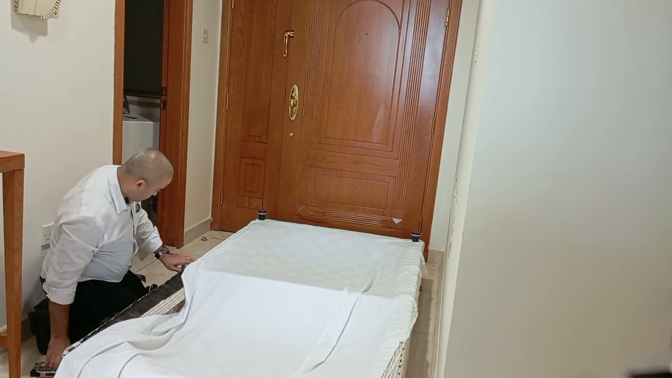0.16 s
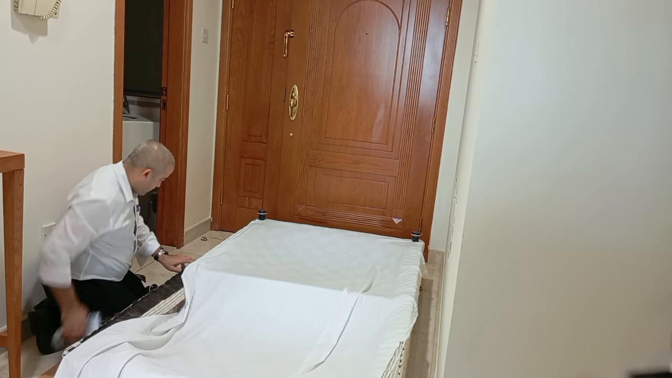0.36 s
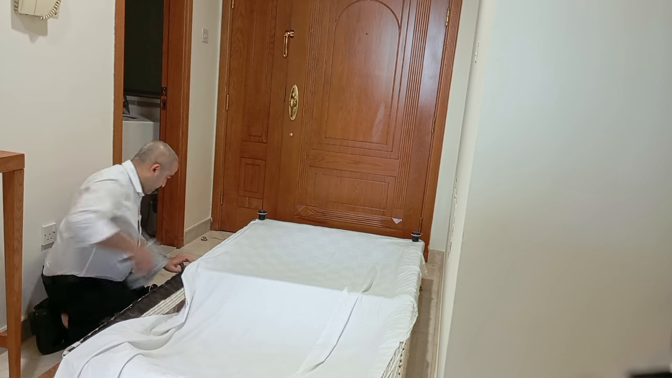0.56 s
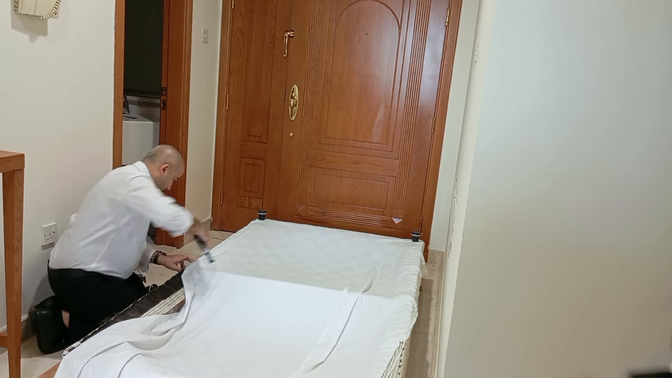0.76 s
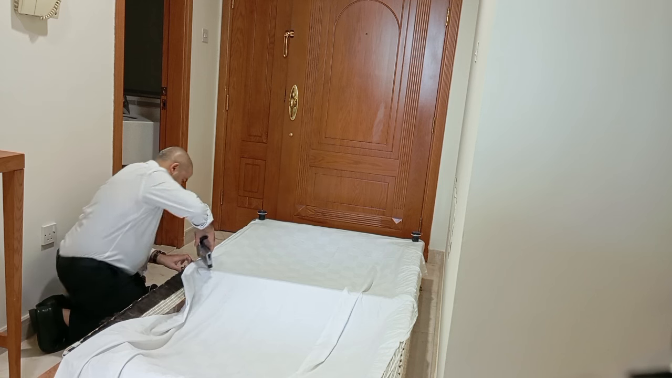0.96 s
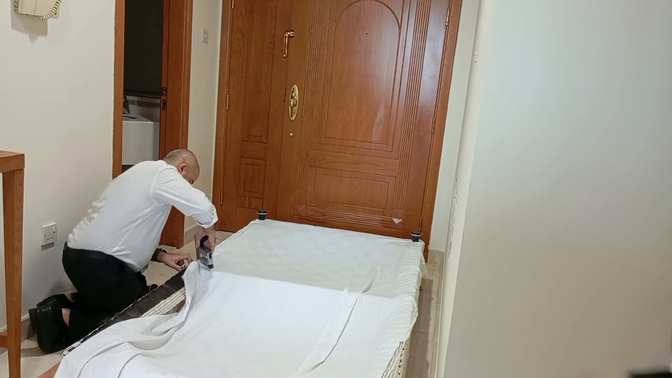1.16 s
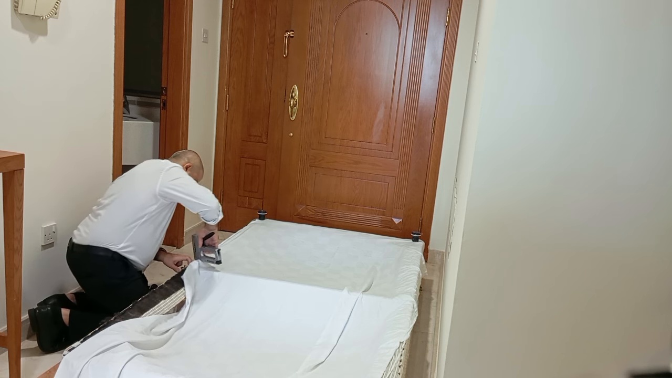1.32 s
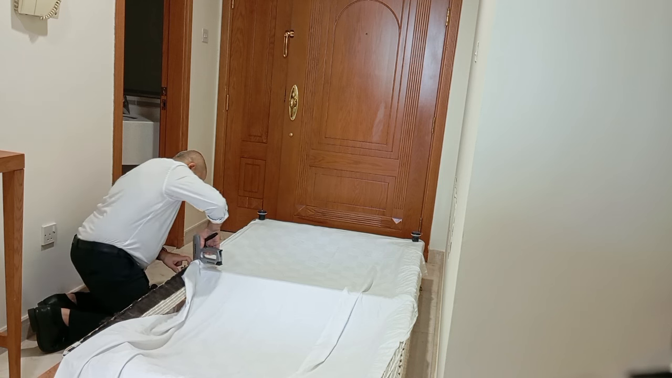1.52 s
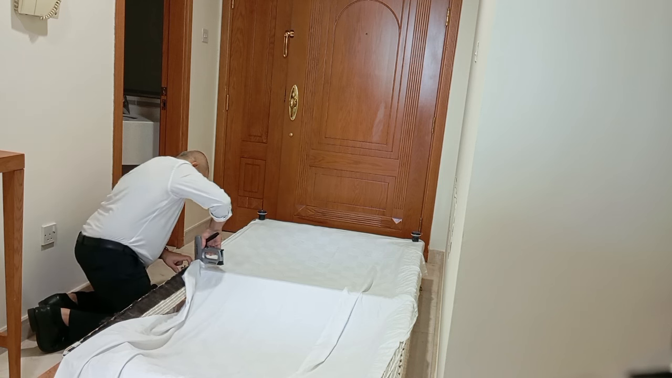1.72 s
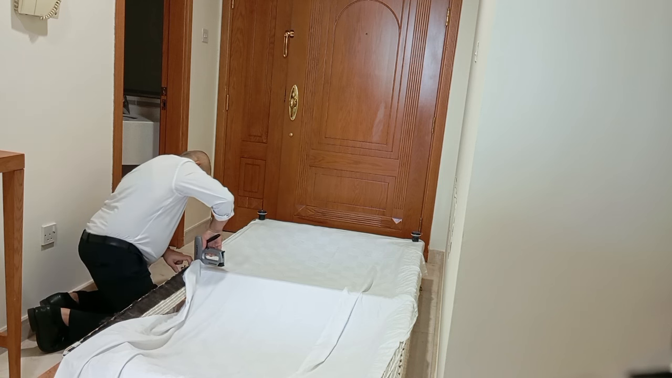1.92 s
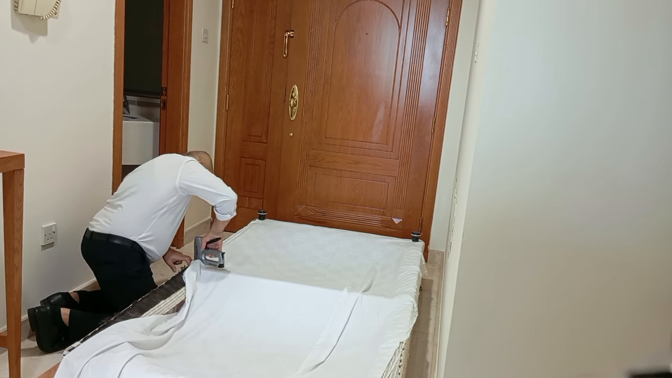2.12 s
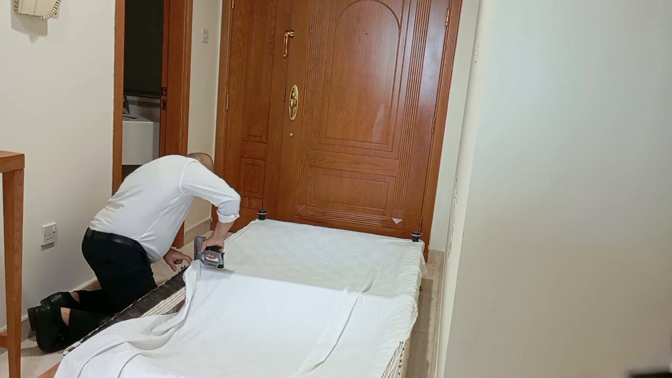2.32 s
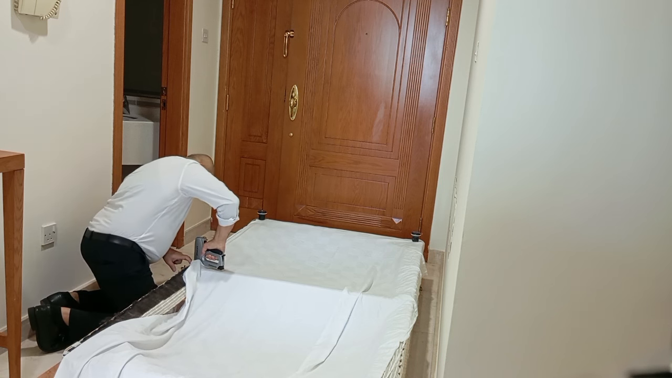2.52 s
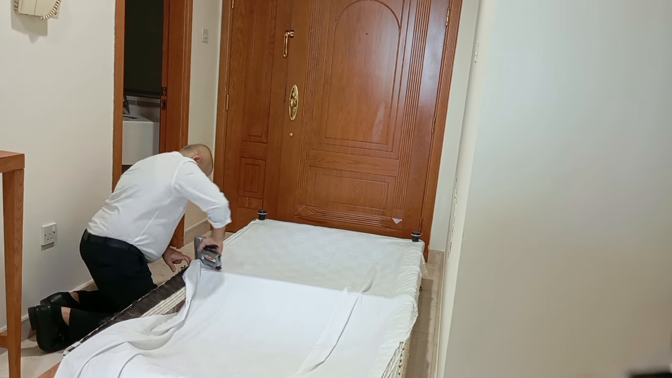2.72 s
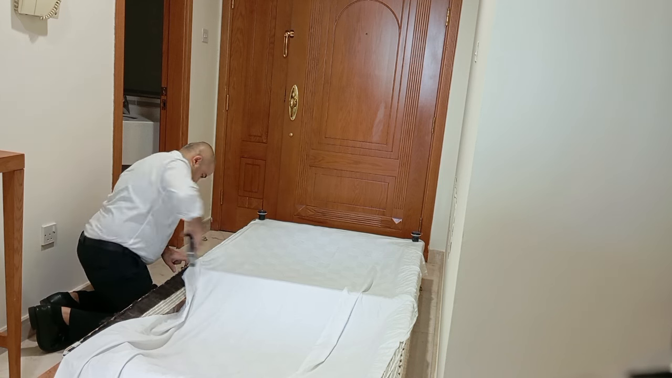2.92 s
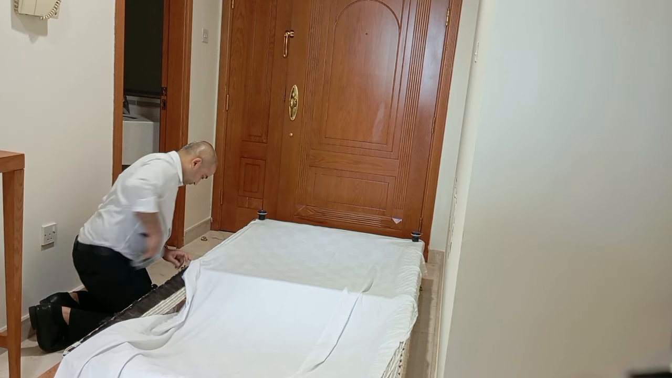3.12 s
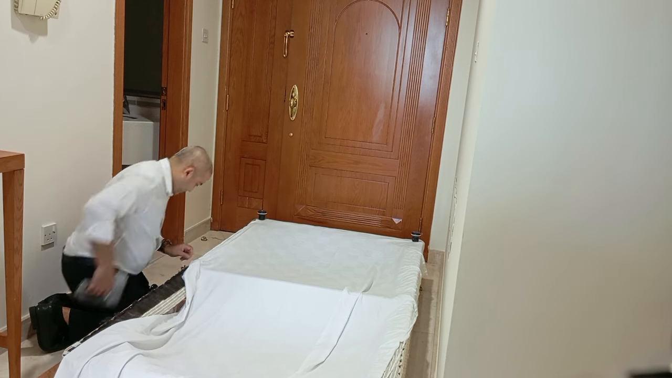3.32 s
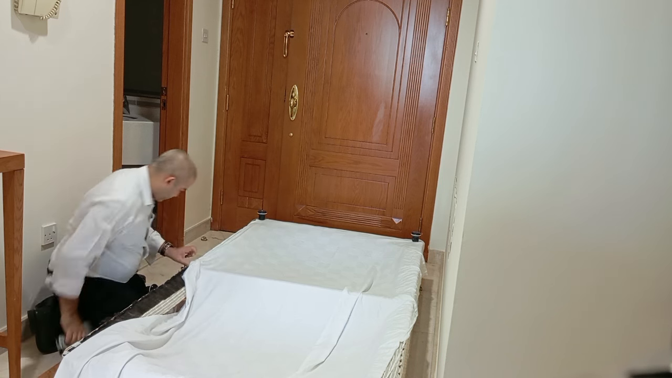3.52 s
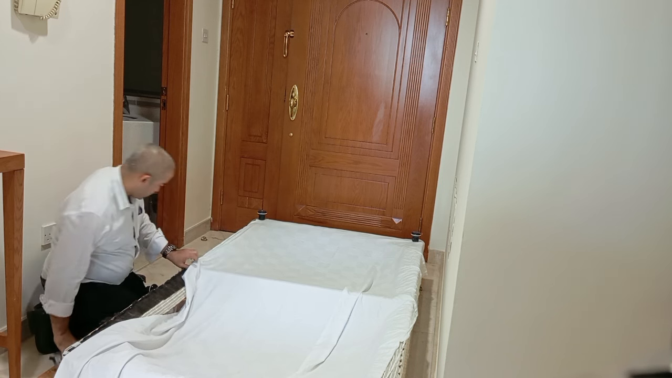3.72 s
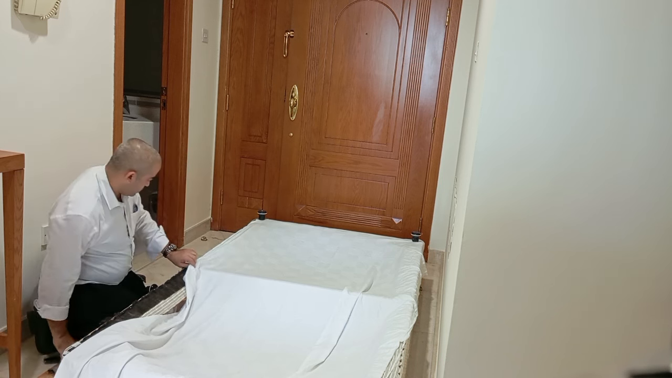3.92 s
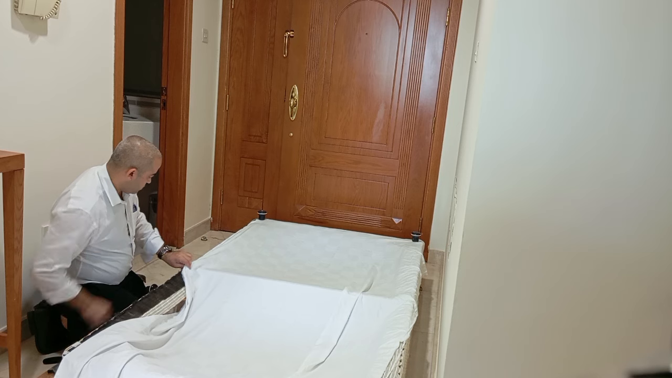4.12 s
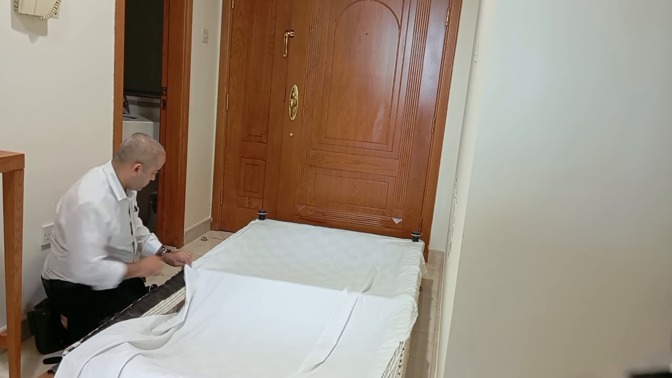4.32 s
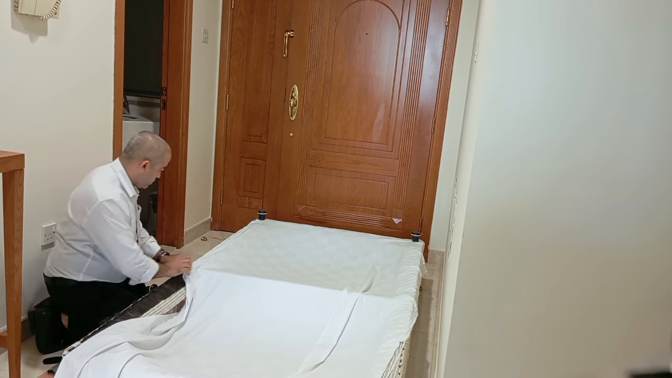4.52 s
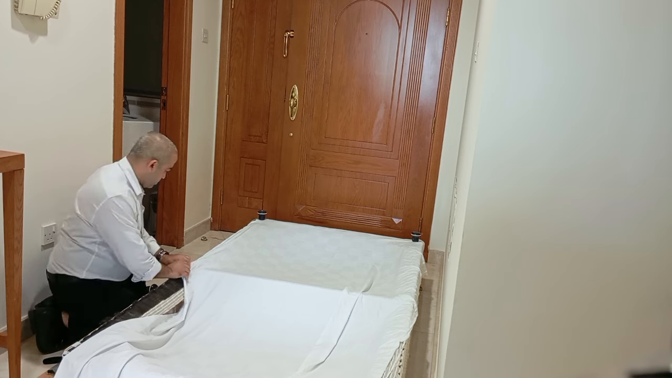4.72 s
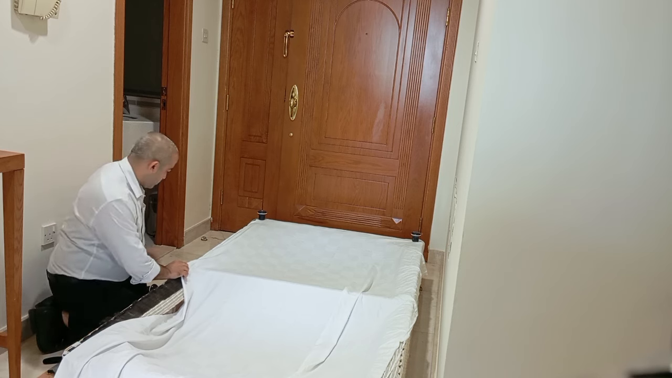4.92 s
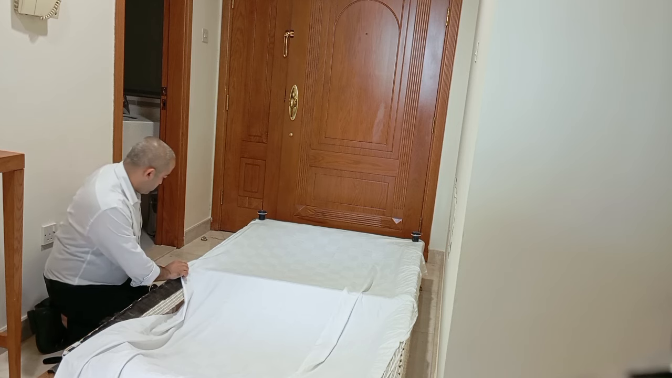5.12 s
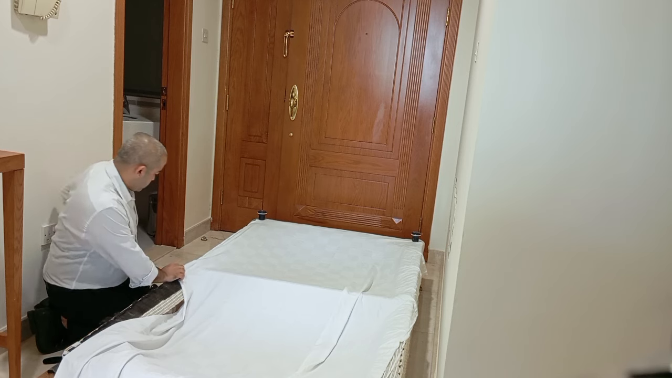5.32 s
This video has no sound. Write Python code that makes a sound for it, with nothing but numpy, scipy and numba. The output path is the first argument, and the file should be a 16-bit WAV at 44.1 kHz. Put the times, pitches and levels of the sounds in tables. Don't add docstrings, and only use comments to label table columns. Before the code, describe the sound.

Quiet indoor hallway air with a soft low rumble. Small dull taps open, then a gentle wooden touch. Midway a single staple shot cracks, hard and metallic with a short low thump, echoing brightly off the walls. Light clicks release it, then heel and body of the stapler clack onto tile, the last knock strongest. Distant, partly shielded microphone; quiet air ends it.

```python
import sys
import numpy as np
from scipy import signal
from scipy.io import wavfile
from scipy.ndimage import minimum_filter1d
from numba import njit

SR = 44100
rng = np.random.default_rng(int(sys.argv[2]) if len(sys.argv) > 2 else 0)


def int16_out(signal):
    q = np.round(np.clip(np.atleast_2d(signal).T, -1, 1) * 32767)
    wavfile.write(sys.argv[1], SR, q.astype(np.int16))


def natural_amplitude(level_db):
    exponent = np.asarray(level_db, float) / 20
    return 10 ** exponent


N = 236180
EDGES = 25 * 2 ** np.arange(0, 9.5, 1 / 3)
CENTRES = np.sqrt(EDGES[1:] * EDGES[:-1])
FAINT = 1e-18 * np.cos(np.arange(N + SR))


def at_hz(points, hz):
    points = np.array(points)
    return np.interp(np.log(hz), np.log(points[:, 0]), points[:, 1])


def bank(pair):
    bands = []
    for k, (low, high) in enumerate(zip(EDGES, EDGES[1:])):
        band_pass = signal.butter(2, [low, high], "band", fs=SR, output="sos")
        bands.append(signal.sosfilt(band_pass, pair[k % 2]))
    return np.array(bands)


def drift(rate_hz):
    r = np.exp(-80 * np.pi * rate_hz / SR)
    noise = rng.standard_normal(N // 40 + 2002)
    slow = signal.lfilter([1], [1, -2 * r, r * r], noise)[2000:]
    return np.interp(np.arange(N) / 40, np.arange(len(slow)), slow / slow.std())


def ring(clicks, hz, t60):
    r = natural_amplitude(-60 / (t60 * SR))
    w = 2 * np.pi * hz / SR
    return signal.lfilter([0, np.sin(w)], [1, -2 * r * np.cos(w), r * r], clicks + FAINT[:len(clicks)])


def resonance(x, hz, width_hz):
    r = np.exp(-np.pi * width_hz / SR)
    zeros = np.array([1, 0, -1]) * (1 - r * r) / 2
    poles = [1, -2 * r * np.cos(2 * np.pi * hz / SR), r * r]
    return signal.lfilter(zeros, poles, x + FAINT[:np.shape(x)[-1]])


def add_resonances(x, modes):
    return x + sum(natural_amplitude(db) * resonance(x, hz, width_hz) for hz, width_hz, db in modes)


# f/Hz, level/dB per Hz
AIR_COLOUR = [(15, -43), (30, -28.5), (59, -4), (149, -1.5), (260, -11.5), (720, -6.5), (1260, -17),
              (16000, -50.5)]
# f/Hz, width/Hz, level/dB
HALL_MODES = [(74.6, 3.2, 8.5), (150, 5.9, 10), (195.4, 6.4, 7), (243, 75, 10)]
# t/s, half length/s, level/dB
TRAFFIC_SWELLS = [(0.364, 0.11, 0), (1.268, 0.13, 2.5), (1.9, 0.068, 3.5), (3.106, 0.3, -0.5),
                  (5.201, 0.078, 0.5)]


def air(level_db=-54.5, hiss_db=-92, patchy_db=0.9):
    t = np.arange(N) / SR
    swell_db = sum(db * np.exp(-((t - s) / half_s) ** 2) for s, half_s, db in TRAFFIC_SWELLS)
    bands = bank(rng.standard_normal((2, N + SR // 4)))[:, SR // 4:]
    out = np.zeros(N)
    for band, hz in zip(bands, CENTRES):
        moving = natural_amplitude(swell_db + patchy_db * drift(2.1)) if hz < 400 else 1
        out += band * natural_amplitude(at_hz(AIR_COLOUR, hz)) * moving
    out = add_resonances(out, HALL_MODES)
    return natural_amplitude(level_db) * out / out.std() + natural_amplitude(hiss_db) * rng.standard_normal(N)


THUMP_TIMES = [
    2.513,
    4.062,
    1.105,
]
# level/dB, f/Hz, t60/s
THUMPS = [(-5, 110, 0.026), (-32.5, 114, 0.017), (-51, 150, 0.53)]


def thump():
    out = np.zeros(N)
    for s, (db, hz, t60) in zip(THUMP_TIMES, THUMPS):
        push = np.zeros(N)
        push[round(s * SR)] = natural_amplitude(db)
        out += ring(push, hz, t60)
    return out


# delay/s, spread/s, level/dB, extra treble/dB per octave
ECHOES = [(.0004, 0.00068, 1.6, -1.5), (.0035, 0.0023, -1.5, -3), (.0056, 0.0017, 5, -4.5),
          (.0088, .0017, 3.5, 2), (0.011, 0.017, -8, -4.5), (0.058, 0.0069, -11.5, -5.5)]
# f/Hz, t60/s
HALL_T60 = [(100, 0.47), (260, .7), (700, 0.68), (1800, 0.7), (4800, 0.6), (9000, 0.45), (12500, .33),
            (15500, 0.18)]


def hallway(tail_db=2.5, tail_rise_s=0.0018):
    t = np.arange(SR) / SR
    tail = natural_amplitude(tail_db) * (1 - np.exp(-t / tail_rise_s)) * rng.standard_normal((2, SR))
    answer = bank(tail) * natural_amplitude(-60 * t / at_hz(HALL_T60, CENTRES)[:, None])
    early = t[:SR // 8]
    octaves = np.log2(CENTRES / 2000)[:, None]
    for delay_s, spread_s, db, tilt_db in ECHOES:
        age = np.maximum(early - delay_s, 0) / spread_s
        noise = rng.standard_normal((2, len(early)))
        bunch = bank(noise * age * np.exp(1 - age) + FAINT[:len(early)])
        answer[:, :len(early)] += bunch * natural_amplitude(db + tilt_db * octaves)
    return answer


# delay/s, level/dB
PATHS = [
    (.0003, 1.5),
    (.0068, 4),
    (0.0109, 3),
]


def knock(hz, swell_cycles=1.1):
    paths = np.array(PATHS)
    t = np.arange(SR // 16) / SR
    cycles = np.maximum(t - paths[:, :1], 0) * hz
    age = cycles / swell_cycles
    swing = age * np.exp(1 - age) * np.sin(2 * np.pi * cycles)
    return natural_amplitude(paths[:, 1]) @ swing


COLOUR_HZ = [60, 130, 450, 900, 4500, 9500, 15000]


def contacts(table, modes, places, tick_over_db, over_tick_db):
    under_thud_db = -16
    part_width, part_db = 0.46, 0.5
    out = np.zeros(N + SR)
    for k, (s, db, thud_db, hard_db, hz) in enumerate(table):
        tick_db = hard_db + tick_over_db
        tone_db = [thud_db + 2 * under_thud_db, thud_db + under_thud_db, thud_db, 0,
                   hard_db, tick_db, tick_db + over_tick_db]
        colour = np.transpose([COLOUR_HZ, tone_db])
        heard = natural_amplitude(db + at_hz(colour, CENTRES)) @ places[k % len(places)]
        heard[:SR // 16] += natural_amplitude(db + at_hz(colour, hz)) * knock(hz)
        struck_part = natural_amplitude(part_db) * resonance(heard, hz, part_width * hz)
        out[round(s * SR):][:SR] += heard + struck_part
    return add_resonances(out, modes)[:N]


# f/Hz, width/Hz, level/dB
STAPLER_ON_TILE = [(265, 40, 5), (325, 40, 3), (830, 50, 1), (960, 60, -3), (1050, 60, 1), (1830, 80, 0),
                   (2090, 140, 2), (2570, 100, -2), (3650, 350, 2), (5050, 200, 1), (5600, 100, -3)]
# t/s, level/dB, wood thud/dB, hardness/dB, struck part f/Hz
LIFTING = [(.012, -50, 3, -21, 1080), (.065, -76, -15.5, -6, 4250), (.287, -43.5, -4, -13.5, 1310),
           (.312, -62.5, -11, -5, 2000), (.405, -43, -5, -9.5, 1220)]


def lift(places):
    return contacts(LIFTING, STAPLER_ON_TILE, places, tick_over_db=-2.0, over_tick_db=-12)


# f/Hz, width/Hz, level/dB
HEEL = [(300, 60, 5), (840, 60, 2), (1250, 90, 2), (1680, 90, 1), (2000, 90, 0), (3000, 200, 1),
        (5700, 400, -4)]
# t/s, level/dB, wood thud/dB, hardness/dB, struck part f/Hz
FIRST_TOUCH = [
    (3.7765, -28.5, -4, -2.5, 1496),
]
# t/s, level/dB, wood thud/dB, hardness/dB, struck part f/Hz
SETTING_DOWN = [(3.953, -25, -8.5, -12.5, 1835), (3.969, -37, -0.5, -14, 854),
                (4.0575, -18.5, 2.5, -2.2, 1026)]


def set_down(places):
    landed = contacts(FIRST_TOUCH, HEEL, places[3:], tick_over_db=-5.4, over_tick_db=-6.5)
    bounced = contacts(SETTING_DOWN, STAPLER_ON_TILE, places, tick_over_db=1, over_tick_db=-10)
    return landed + bounced


# f/Hz, width/Hz, level/dB
STAPLER_ON_FRAME = [(262, 30, 12), (322, 35, 7), (522, 45, 4), (1060, 60, 2), (1745, 80, 4), (2050, 70, 2),
                    (2700, 150, 1), (2935, 60, 0), (3210, 60, 1), (3550, 90, 0), (5030, 140, 0),
                    (5830, 160, -5)]
# t/s, level/dB, wood thud/dB, hardness/dB, struck part f/Hz
PRESSING = [(.986, -61, -19, -10.5, 5400), (1.099, -38.5, -11, -21, 1380), (1.104, -38, 0, -24.5, 2000),
            (2.047, -85, -6.5, -5.5, 5180), (2.075, -66.5, 3, -9.5, 2933), (2.374, -67.5, -3.5, 1.5, 8130),
            (2.472, -48.5, 1.5, -2.5, 3000), (2.506, -22.5, 1, -10, 1550), (2.5087, -12, -5, 0.5, 2433),
            (2.5125, -16, 1, 1.7, 822), (2.524, -15.5, -3, -3, 1680), (2.878, -51.5, -18, -3, 7900),
            (3.033, -41.5, -27.5, -2, 943), (3.0355, -41, -42, -7.5, 1900), (5.095, -85.5, -2, 3, 9500)]


def press_and_fire(places):
    return contacts(PRESSING, STAPLER_ON_FRAME, places, tick_over_db=-0.5, over_tick_db=-4)


def scene():
    places = [hallway() for place in range(4)]
    stapler = lift(places) + press_and_fire(places) + set_down(places)
    return (air() + thump() + stapler)[None]


@njit
def follow(wanted_db, fall, rise):
    out, now = np.empty_like(wanted_db), 0.
    for i in range(len(wanted_db)):
        now += (wanted_db[i] - now) * (fall if wanted_db[i] < now else rise)
        out[i] = now
    return out


def limiter(x):
    ceiling_db, look_ahead_s = -5.5, 0.0015
    attack_s, release_s = 0.00009, 0.08
    wanted_db = np.minimum(ceiling_db - 20 * np.log10(np.abs(x[0]) + 1e-9), 0)
    ahead = round(look_ahead_s * SR)
    wanted_db = minimum_filter1d(wanted_db, size=2 * ahead + 1)
    return x * natural_amplitude(follow(wanted_db, 1 / (attack_s * SR), 1 / (release_s * SR)))


def low_pass(x):
    return signal.sosfilt(signal.butter(12, 16990, fs=SR, output="sos"), x)


def record(dry):
    port = natural_amplitude(3) * resonance(dry, 9106, width_hz=1300)
    housing_dip = 0.16 * resonance(dry, 4910, width_hz=360)
    x = dry + port - housing_dip
    x = signal.sosfilt(signal.butter(3, 50, "high", fs=SR, output="sos"), x)
    x = signal.sosfilt(signal.cheby2(14, 50, 16200, fs=SR, output="sos"), x)
    return low_pass(limiter(x))


dry = scene()
out = record(dry)
int16_out(out)
```